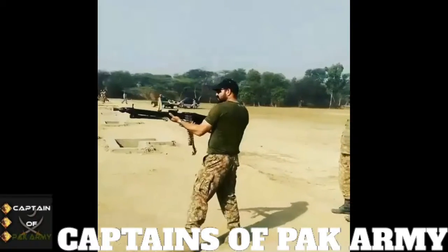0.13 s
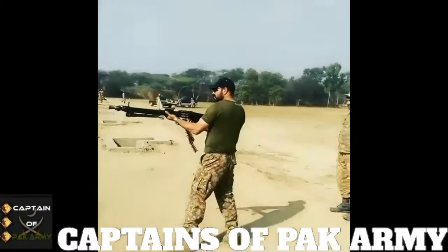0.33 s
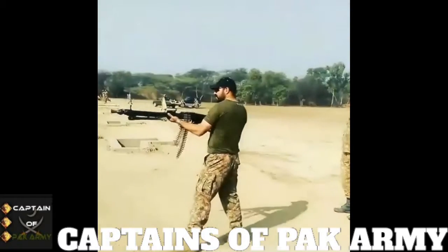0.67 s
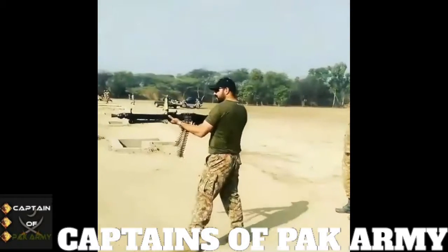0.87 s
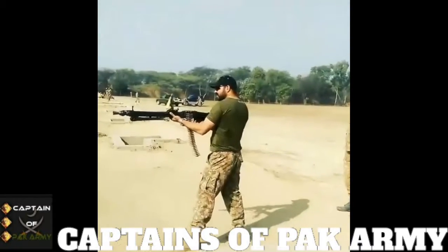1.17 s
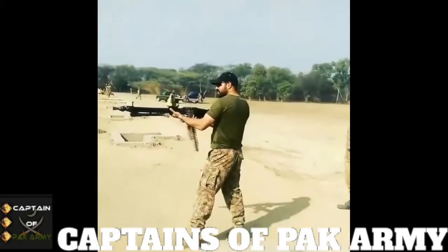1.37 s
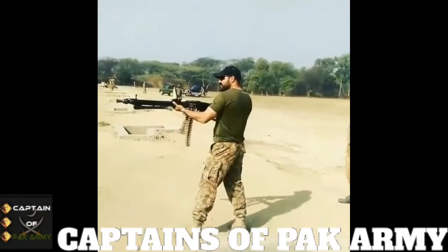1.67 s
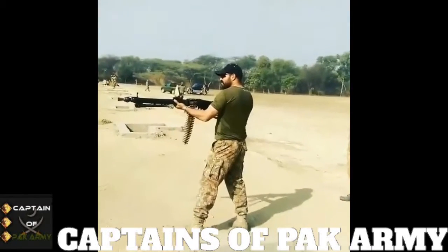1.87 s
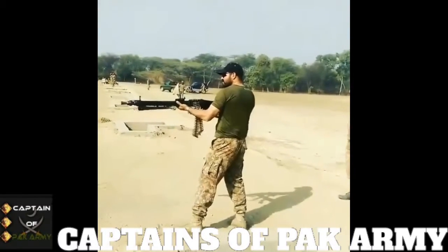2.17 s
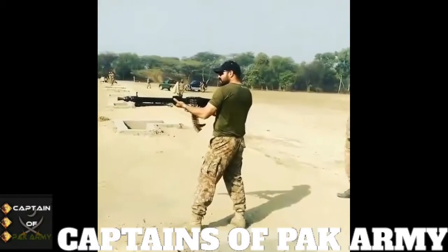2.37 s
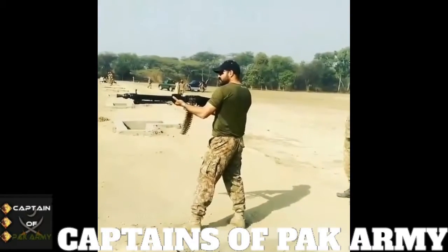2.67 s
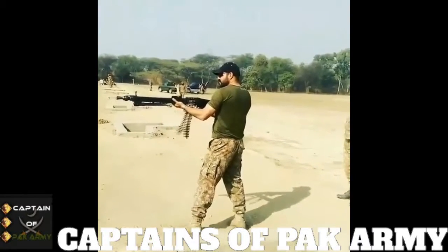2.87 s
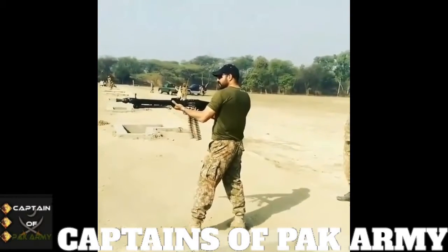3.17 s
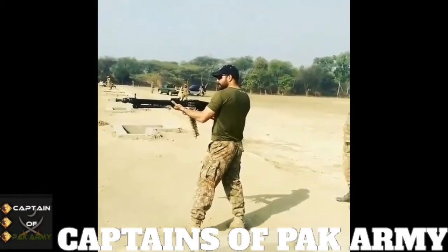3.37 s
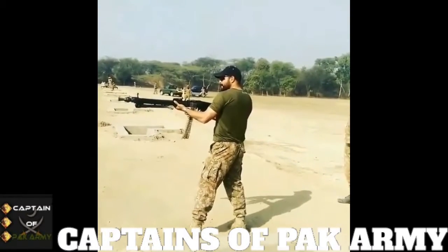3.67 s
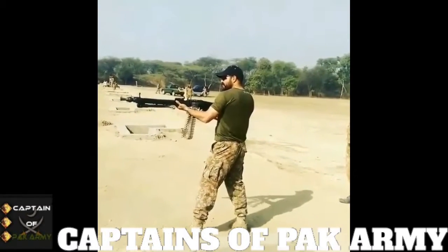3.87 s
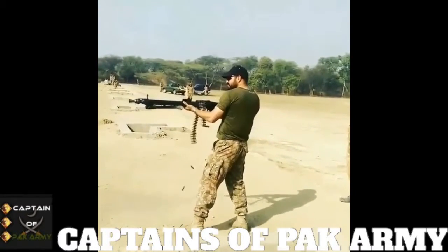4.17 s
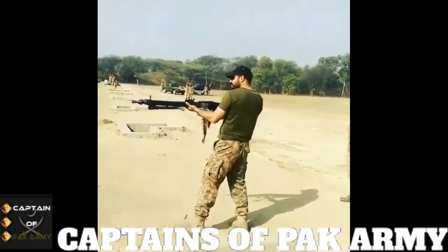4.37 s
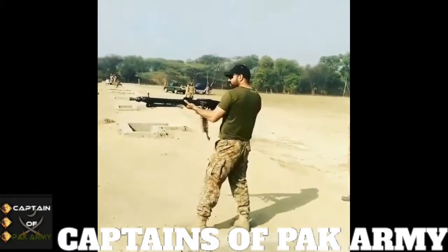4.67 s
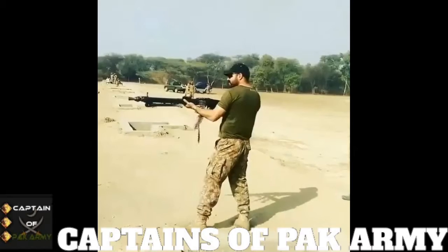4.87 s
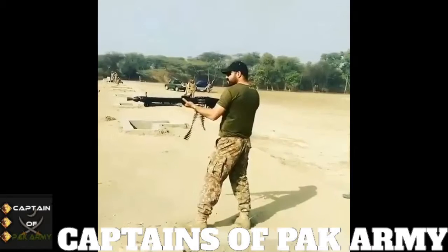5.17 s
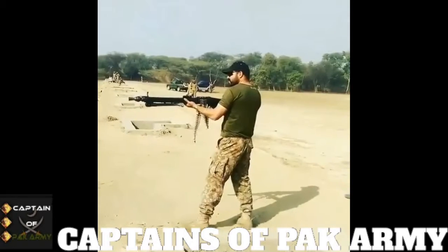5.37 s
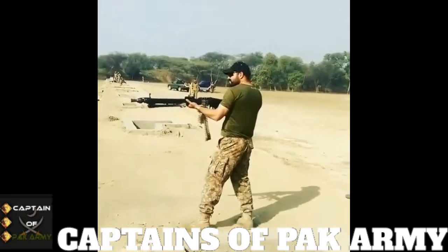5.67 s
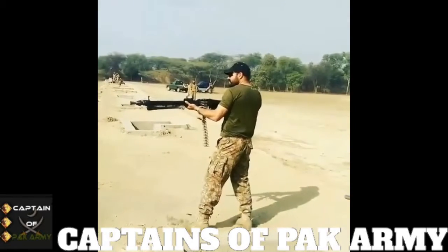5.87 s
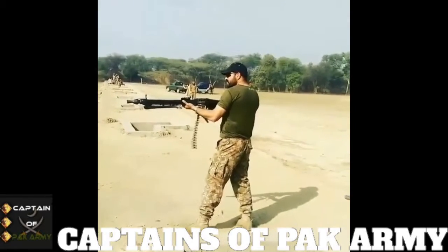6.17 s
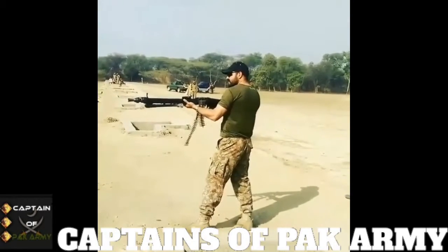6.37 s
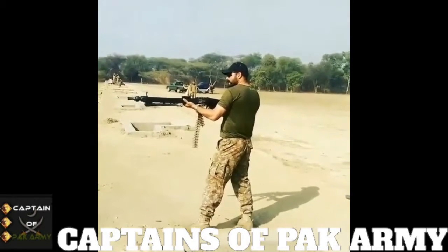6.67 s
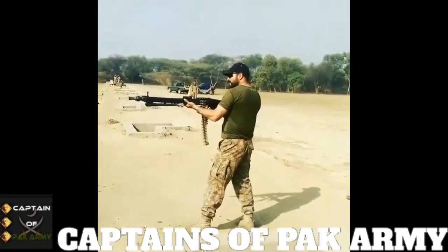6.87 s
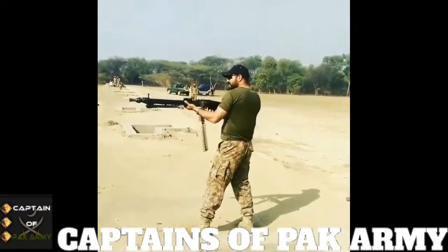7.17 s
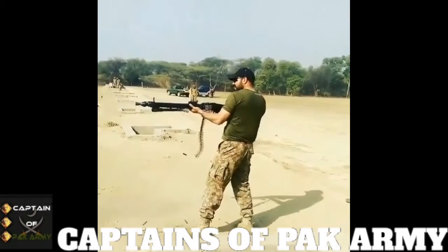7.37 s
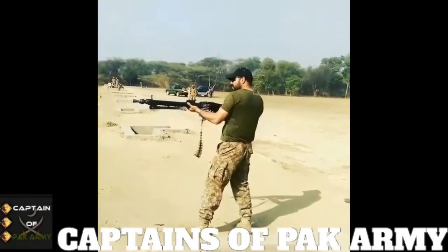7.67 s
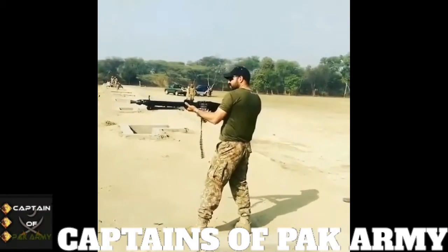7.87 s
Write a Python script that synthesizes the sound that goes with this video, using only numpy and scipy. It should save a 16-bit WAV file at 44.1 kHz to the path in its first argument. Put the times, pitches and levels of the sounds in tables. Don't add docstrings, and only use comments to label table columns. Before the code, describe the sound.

The tail of an earlier burst opens with a loud knock and clinking brass, then its echo slaps back and rumbles away. Four quick bursts follow about every two seconds, dry, blasting and clipped. Each has a metallic bolt scrape ahead, a thin ringing afterwards, a delayed bank echo, and a wide rolling tail. Close, rough mono microphone with dull, grainy treble.

```python
import sys
import numpy as np
from scipy import signal
from scipy.fft import rfft, irfft, next_fast_len
from scipy.io import wavfile
from scipy.ndimage import uniform_filter1d, minimum_filter1d, map_coordinates

SR = 44100
rng = np.random.default_rng(int(sys.argv[2]) if len(sys.argv) > 2 else 0)


def voltage_ratio(decibels):
    exponent = np.asarray(decibels, float) / 20
    return 10 ** exponent


def inscribe(sig):
    pcm = np.round(np.clip(np.atleast_2d(sig).T, -1, 1) * 32767)
    wavfile.write(sys.argv[1], SR, pcm.astype(np.int16))


N = 354123

# start in seconds, peak in dB, blast length in seconds, bass in dB.
SHOTS = [(1.991, -8, 0.025, 5), (2.044, -2, 0.027, -13), (2.097, -2.5, 0.028, 0), (4.079, -5.5, 0.026, 2),
         (4.131, 0, 0.024, 1), (4.18, -3.5, 0.033, 0), (4.228, -2.5, 0.028, 7), (5.672, -3.5, 0.031, 0),
         (5.727, -1.5, 0.025, 4), (5.778, -2.5, 0.031, 4.5), (7.231, -2, 0.028, 3),
         (7.283, -2.5, 0.028, 8.5), (7.334, -2, 0.024, 7), (7.382, -3.5, 0.028, 4)]
EARLIER_SHOTS = [-.1442, -.0922, -.0424]
# start in seconds, peak in dB.
BOLT_RUNS = [
    (1.9345, -18.5),
    (4.0242, -18.5),
    (5.6131, -18.5),
    (7.1701, -20),
]
# frequency in Hz, level in dB.
BLAST_COLOUR = [(24, -39), (40, -6.5), (289, -2.5), (1520, -8), (1890, -4.5), (3830, -9), (7050, -15),
                (8160, -17), (10900, -17.5), (12700, -36), (13600, -43.5)]
# frequency in Hz, level in dB.
SCRAPE_COLOUR = [(350, -31.5), (600, -3), (936, -2), (1560, -7), (5180, 1.5), (12000, -8), (13600, -50)]
# extra delay in seconds, level in dB.
BANK_FACES = [
    (0, -2),
    (.0066, -17.5),
    (0.0157, -15.5),
    (0.0223, -26),
]
# start in seconds, peak in dB, pitch in Hz, body in dB.
CLINKS = [(0.034, -20, 5000, -2.5), (0.0546, -13, 4880, -2.5), (0.1136, -21, 4450, 1),
          (0.322, -30, 4470, -13), (0.355, -23, 6160, 6), (0.41, -27, 4640, 5), (0.4924, -40, 4200, -17),
          (1.5826, -40, 4370, -16), (2.1768, -24, 4600, 6), (2.3089, -23, 4640, -23),
          (2.4891, -25, 6160, -20), (4.3957, -25, 4570, -14.5), (4.45, -13, 5050, -28),
          (4.5034, -36, 4850, -7), (4.5791, -20, 6100, 7), (4.6334, -12.5, 5900, -10),
          (4.674, -19, 5500, -13), (5.0883, -44, 4570, -18), (5.228, -47, 4310, 5), (6.053, -35.5, 4260, 9),
          (6.2702, -29.5, 4270, -5), (7.4599, -19, 2600, -6), (7.503, -31, 4720, -12),
          (7.7303, -24, 6260, 1), (7.7845, -32, 6310, 9), (7.8273, -25, 5260, -5)]
# frequency in Hz, level in dB.
TICK_COLOUR = [(2000, -16.5), (3500, 3.5), (6000, -0.5), (9000, -8), (12000, -16), (14000, -54)]
# start in seconds, level in dB.
RINGING_CASES = [(4.635, -47)]
# frequency in Hz, level in dB, time to fall 60 dB in seconds.
BRASS_MODES = [(10530, 11, 0.23), (10770, 0, 0.51), (6400, 1, .2)]
# start in seconds, level in dB.
RECEIVER_RINGS = [
    (.09, -48.5),
    (2.17, -43.5),
    (4.29, -37),
    (5.84, -40),
    (7.44, -40.5),
]

# frequency in Hz, level in dB.
BOOM_COLOUR = [(15, -58), (25, -31), (57, -30.5), (81, -15), (193, -2.5), (259, -4.5), (297, 0), (520, -6),
               (680, -50.5), (1140, -120)]
GROWL_COLOUR = [(350, -27), (480, -2), (700, -1), (1000, -3), (1300, -14), (1700, -37)]
ROAR_COLOUR = [(710, -35), (1200, -6), (1330, -3), (1910, 3), (2230, 2), (2830, -9), (3460, -11),
               (4200, -24.5), (5460, -48), (9240, -120)]
HISS_COLOUR = [(1760, -40), (3000, -4), (3450, -7), (4360, -9), (6040, -14.5), (8940, -26.5),
               (13000, -34.5)]
# frequency in Hz, level in dB.
FAR_BOOM_COLOUR = [(15, -58), (25, -33), (57, -24.5), (100, -11.5), (200, -1.5), (300, -3.5), (420, -10.5),
                   (700, -38)]
# start in seconds, peak in dB, pitch in Hz.
THUDS = [(0.551, -23, 252), (1.157, -13.5, 210), (1.191, -36, 133), (1.766, -21.5, 137), (1.865, -27, 144),
         (2.299, -5, 310), (2.37, -6, 320), (2.434, -7.5, 283), (3.172, -25, 145), (3.285, -16, 136),
         (3.403, -19.5, 229), (3.624, -14, 149), (3.645, -20, 122), (3.668, -22, 133), (4.385, -7, 302),
         (5.935, -7.5, 288), (6.745, -25, 120.5), (7.077, -10.5, 180), (7.105, -18, 165),
         (7.553, -8.5, 335)]
# start in seconds, peak in dB, pitch in Hz.
KNOCKS = [
    (0.0551, -4, 320),
    (7.0492, -14.5, 390),
]
WAKE = {"boom": -24.5, "growl": -21.5, "roar": -34.5, "hiss": -15, "rumble": -34.5}
NEAR = {"boom": (-26, 0.57, -1.5, 0.7237, -44), "growl": (-25.5, 0.8, -27.5, 0.97, -110),
        "roar": (-36.5, 0.33, 5, 0.5072, -39.5), "hiss": (-40.5, 0.39, -6, 0.62, -62),
        "rumble": (-36, 0.66, 2.4, 0.94, -84)}
FAR = {"boom": (-34, -11), "growl": (-49.5, -8.5), "roar": (-32.5, -18), "hiss": (-56, -15.5),
       "rumble": (-42, -4.1)}
# delay in seconds, depth in seconds.
BELTS = [
    (.27, 0.18),
    (0.599, 0.12),
    (1.28, 0.16),
]
TREES = {"boom": (-24.5, -28.5, -54), "growl": (-29, -40, -64), "roar": (-36, -31, -54.5),
         "hiss": (-41.5, -56.5, -76), "rumble": (-39.5, -43, -48.5)}
# time in seconds, level in dB.
CARRY = [
    (0, -1),
    (2.05, -2.5),
    (4.15, -1.7),
    (5.7, -3.5),
    (7.3, -2.3),
]
# centre in seconds, level in dB, half length in seconds.
SWELLS = [(0.99, -30, 0.16), (1.175, -25.5, 0.044), (1.328, -36, 0.045), (1.423, -42, 0.019),
          (1.763, -37, 0.13), (1.887, -50, .02), (2.99, -45, 0.022), (3.192, -24.5, 0.032),
          (3.298, -29, 0.018), (3.445, -30, 0.058), (3.636, -30.5, 0.064), (3.948, -39, 0.089),
          (5.173, -52, 0.024), (5.38, -50, 0.041), (5.589, -36.5, .07), (6.767, -44, 0.019),
          (6.95, -40, 0.017), (7.08, -33.5, 0.044)]
# frequency in Hz, level in dB.
RUMBLE_COLOUR = [(15, -45), (30, -8.5), (75, 3.5), (110, 1), (160, 0.5), (260, -17), (600, -52)]

# start in seconds, depth in dB, length in seconds.
DUCKS = [
    (0.059, -8, 0.061),
    (4.58, -9, 0.049),
]
# frequency in Hz, level in dB.
SELF_NOISE = [(2000, -10), (5000, 0), (12500, -2), (13500, -20)]
# frequency in Hz, step against the frame level in dB.
BAND_STEP = [(0, -32.5), (3000, -28.5), (7000, -26), (9000, -23), (12000, -13), (14000, -4.5)]

BANK_DELAY_S = .7561
RECEIVER_HZ = 7833
WAKE_FADE = -220
STUN_DB, RECOVER_S = -5.5, 0.092
SLAP_STUN_DB, SLAP_RECOVER_S = -2, 0.031
SWELL_BOOM_DB, SWELL_GROWL_DB, SWELL_BRIGHTENS = -10.5, -1.1, 2.1
DULL_UNDER_DB, DULL_RANGE_DB = -22, 9.5


def unit(x):
    return x / np.sqrt(np.mean(x ** 2) + 1e-20)


def add(track, s, sound):
    i = round(s * SR)
    track[i:i + len(sound)] += sound[:max(len(track) - i, 0)]


def cut(track, s, length):
    i = round(s * SR)
    return track[i:i + length]


def noise():
    return rng.standard_normal(N)


def coloured(x, spectrum):
    m = next_fast_len(len(x) + 8192)
    hz, db = np.transpose(spectrum)
    log_f = np.log(np.fft.rfftfreq(m, 1 / SR) + 1)
    gain = voltage_ratio(np.interp(log_f, np.log(hz + 1), db, left=-120, right=-120))
    return unit(irfft(rfft(x, m) * gain, m)[:len(x)])


def wobble(rate):
    knots = rng.standard_normal(int(N * rate / SR) + 4)
    return map_coordinates(knots, [np.arange(N) * rate / SR])


def scattered(rate, spread_db, share):
    hits = (rng.random(N) < rate / SR) * noise() * voltage_ratio(spread_db * rng.exponential(size=N))
    share = np.clip(share, 0, 1)
    return np.sqrt(share) * unit(hits) + np.sqrt(1 - share) * noise()


def patchy(x, depth_db):
    z = signal.stft(x, nperseg=256)[2]
    field = uniform_filter1d(rng.standard_normal(z.shape), size=3, axis=0)
    field = uniform_filter1d(field, size=6, axis=1)
    return unit(signal.istft(z * voltage_ratio(depth_db * unit(field)), nperseg=256)[1][:N])


def thump(hz, cycles):
    turns = np.arange(SR // 20) / SR * hz
    u = turns / cycles
    return -np.sin(2 * np.pi * turns ** 0.81) * u * np.exp(1 - u ** 1.8)


def gun():
    out, t = np.zeros(N), np.arange(SR // 5) / SR
    gas = patchy(coloured(scattered(1500, 2, .15), BLAST_COLOUR), depth_db=2.2)
    ground = coloured(noise(), ROAR_COLOUR) + 1.4 * coloured(noise(), GROWL_COLOUR)
    low = coloured(noise(), BOOM_COLOUR)
    steel = patchy(coloured(scattered(500, 3, .35), SCRAPE_COLOUR), depth_db=2.5)
    for s, db, hold, bass_db in SHOTS:
        bass = cut(low, s, len(t))
        body = cut(gas, s, len(t)) + voltage_ratio(bass_db - 15.5) * bass
        fall = np.maximum(t - hold + .003, 0)
        collapse = voltage_ratio(-60 * fall / .052)
        tail = voltage_ratio(-15.0 - 60 * fall / .3) * (cut(ground, s, len(t)) + bass + 0.33 * body)
        rise = (1 - np.exp(-t / 0.0011)) * voltage_ratio(db - 7 - 115 * t)
        add(out, s, rise * (collapse * body + tail))
    run = t[t < .066]
    for s, db in BOLT_RUNS:
        speed_db = 9 * (run / run[-1]) ** 4
        rise = 1 - np.exp(-run / 0.0062)
        add(out, s - .004, rise * voltage_ratio(db - 12.5 + speed_db) * cut(steel, s, len(run)))
    return out


def bank():
    out, t = np.zeros(N), np.arange(SR // 20) / SR
    onset = 1 - np.exp(-t / 0.00061)
    push = thump(262, cycles=.84)
    tones = np.sin(2 * np.pi * 970 * t) + 0.32 * np.sin(2 * np.pi * 1380 * t)
    ripple = voltage_ratio(-11.5 - 60 * t / 0.028) * tones * onset
    dust = noise()
    grit, snap = coloured(dust, ROAR_COLOUR), coloured(dust, TICK_COLOUR)
    for s in EARLIER_SHOTS + [row[0] for row in SHOTS]:
        crack = voltage_ratio(-20.5 - 60 * t / 0.038) * onset * cut(grit, abs(s), len(t))
        edge = voltage_ratio(-31 - 60 * t / .012) * onset * cut(snap, abs(s), len(t))
        add(out, s + BANK_DELAY_S + .002, edge)
        for lag, db in BANK_FACES:
            add(out, s + BANK_DELAY_S + lag, voltage_ratio(db + rng.normal(0, 1.0)) * (push + ripple + crack))
    return out


def metal():
    out, t = np.zeros(N), np.arange(SR // 2) / SR
    grit, dirt = coloured(noise(), TICK_COLOUR), coloured(noise(), ROAR_COLOUR)
    for s, db, hz, body_db in CLINKS:
        impact = .5 * cut(grit, s / 2, len(t)) + voltage_ratio(body_db) * cut(dirt, s / 2, len(t))
        ping = voltage_ratio(0.5 - 60 * t / 0.0054) * np.sin(2 * np.pi * hz * t)
        tick = ping + voltage_ratio(-60 * t / 0.016) * impact
        add(out, s, (1 - np.exp(-t / 0.00034)) * voltage_ratio(db + 5.0) * tick)
    for s, db in RINGING_CASES:
        for hz, level, t60 in BRASS_MODES:
            add(out, s, voltage_ratio(db + level - 60 * t / t60) * np.sin(2 * np.pi * hz * t))
    flutter = voltage_ratio(1.5 * wobble(30))
    drift = .9 * wobble(40)
    for s, db in RECEIVER_RINGS:
        rise = 1 - np.exp(-(t / 0.046) ** 2)
        swell = rise * voltage_ratio(db + 5.5 - 60 * t / 1.7 - 12 * (t / 0.34) ** 4)
        tone = np.sin(2 * np.pi * RECEIVER_HZ * t + cut(drift, s / 2, len(t)))
        add(out, s, swell * cut(flutter, s / 2, len(t)) * tone)
    return out


def roll():
    boom_db, growl_db, roar_db, hiss_db = map(echo_db, ["boom", "growl", "roar", "hiss"])
    boom_db = 20 * np.log10(voltage_ratio(boom_db) + voltage_ratio(SWELL_BOOM_DB) * swells(1))
    growl_db = 20 * np.log10(voltage_ratio(growl_db) + voltage_ratio(SWELL_GROWL_DB) * swells(SWELL_BRIGHTENS))
    lumps = wobble(14)
    returns, lows = scattered(700, 2.1, .12), scattered(300, 1.0, .15)
    far = np.clip((DULL_UNDER_DB - boom_db) / DULL_RANGE_DB, 0, 1)
    boom = coloured(lows, BOOM_COLOUR) * (1 - far) + coloured(lows, FAR_BOOM_COLOUR) * far
    boom *= voltage_ratio(boom_db + 0.4 * lumps + 0.96 * wobble(40))
    growl = patchy(coloured(returns, GROWL_COLOUR), depth_db=1.5)
    growl *= voltage_ratio(growl_db + 0.48 * lumps + 0.6 * wobble(40))
    roar = patchy(coloured(returns, ROAR_COLOUR), depth_db=1.5)
    roar *= voltage_ratio(roar_db + 0.22 * lumps + 1.2 * wobble(60))
    hiss = patchy(coloured(returns, HISS_COLOUR), depth_db=4.0)
    hiss *= voltage_ratio(hiss_db + 1.8 * lumps + 1.6 * wobble(60))
    for s, db, hz in THUDS:
        add(boom, s + .004, voltage_ratio(db - 4) * thump(hz, cycles=1.0))
    for s, db, hz in KNOCKS:
        add(boom, s, voltage_ratio(db) * thump(hz, cycles=0.72))
    return boom + growl + roar + hiss


def rumble():
    level = voltage_ratio(echo_db("rumble")) + swells(1)
    return voltage_ratio(-3.5) * level * coloured(scattered(80, 1.3, .3), RUMBLE_COLOUR)


def echo_db(layer):
    t = np.arange(0, N + 64, 64) / SR
    shots = np.array(EARLIER_SHOTS + [row[0] for row in SHOTS])[:, None]
    fired, delay = t > shots, np.maximum(t - shots, 0)
    wake = voltage_ratio(WAKE[layer] + WAKE_FADE * delay)
    db, build, slope, last, fall = NEAR[layer]
    near_db = db + slope * np.minimum(delay, last) + fall * np.maximum(delay - last, 0)
    near = (1 - np.exp(-(delay / build) ** 2)) * voltage_ratio(near_db)
    hedge, line, wood = [voltage_ratio(tree_db) * np.exp(-.5 * ((delay - s) / depth) ** 2)
                         for (s, depth), tree_db in zip(BELTS, TREES[layer])]
    far_db, far_slope = FAR[layer]
    carry = voltage_ratio(np.interp(shots, *np.transpose(CARRY)))
    far_power = carry ** 2 * (voltage_ratio(far_db + far_slope * delay) ** 2 + line ** 2 + wood ** 2)
    power = np.sum(fired * (wake ** 2 + near ** 2 + hedge ** 2 + far_power), axis=0)
    stun_db = STUN_DB * np.sum(fired * np.exp(-delay / RECOVER_S), axis=0)
    since_slap = delay - BANK_DELAY_S
    slap = (since_slap > 0) * np.exp(-np.abs(since_slap) / SLAP_RECOVER_S)
    stun_db = stun_db + SLAP_STUN_DB * np.max(slap, axis=0)
    return np.interp(np.arange(N) / SR, t, 10 * np.log10(power) + stun_db)


def swells(growth):
    t = np.arange(N) / SR
    return sum(voltage_ratio(growth * db) * np.exp(-.5 * ((t - s) / half) ** 2) for s, db, half in SWELLS)


def scene():
    return (gun() + bank() + metal() + roll() + rumble())[None]


def coarse_bands(x):
    f, _, z = signal.stft(x, SR, window="cosine", nperseg=1024)
    size = np.abs(z)
    frame = np.sqrt(np.mean(size ** 2, axis=-2, keepdims=True))
    frame = minimum_filter1d(frame, size=5)
    band = (f // 400).astype(int)
    spare = uniform_filter1d(rng.standard_normal((band.max() + 1, z.shape[-1])), size=5)
    luck = voltage_ratio(4.5 * unit(spare))[band]
    hz, db = np.transpose(BAND_STEP)
    masked = frame * voltage_ratio(np.interp(f, hz, db))[:, None]
    nearby = voltage_ratio(-4) * uniform_filter1d(size, size=15, axis=-2) * (f > 900)[:, None]
    step = luck * np.maximum(masked, nearby)
    coarse = step * (np.round(z.real / step) + 1j * np.round(z.imag / step))
    return signal.istft(coarse, SR, window="cosine", nperseg=1024)[1][..., :N]


def top_cut(x):
    return signal.sosfilt(signal.butter(12, 13770, fs=SR, output="sos"), x)


def record(dry):
    t = np.arange(N) / SR
    dip_db = sum(db * (t > s) / (1 + np.abs((t - s) / length) ** 4) for s, db, length in DUCKS)
    x = dry * voltage_ratio(uniform_filter1d(dip_db, size=200))
    x = x / (1 + np.abs(x / .68) ** 6) ** (1 / 6)
    loudness = uniform_filter1d(np.abs(x), size=4000)
    hiss = patchy(coloured(noise(), SELF_NOISE), depth_db=3)
    hiss = voltage_ratio(-73) * hiss / (1 + (loudness / .07) ** 2)
    return top_cut(coarse_bands(x) + hiss)


dry = scene()
out = record(dry)
inscribe(out)
```